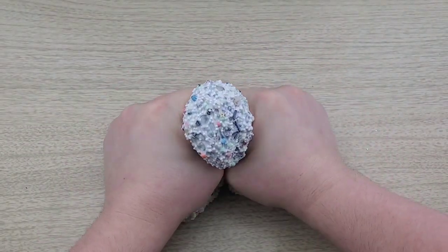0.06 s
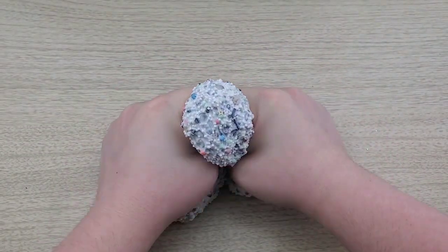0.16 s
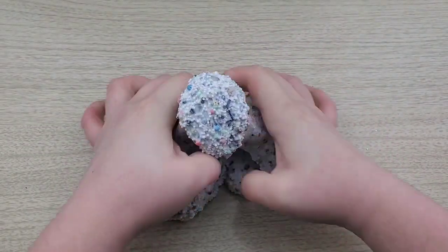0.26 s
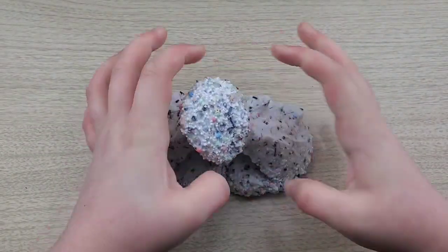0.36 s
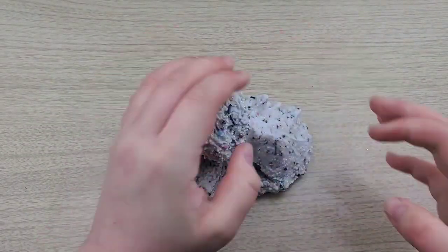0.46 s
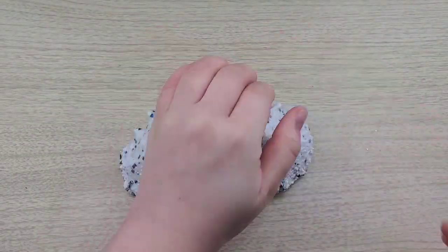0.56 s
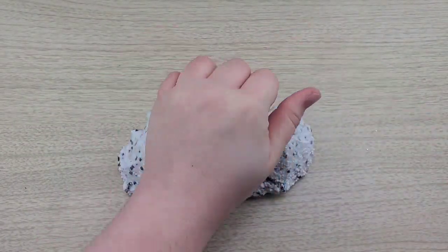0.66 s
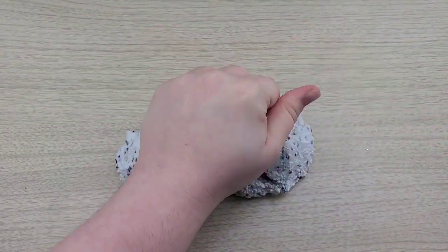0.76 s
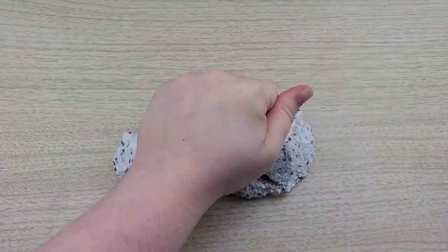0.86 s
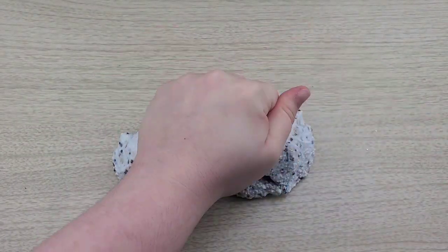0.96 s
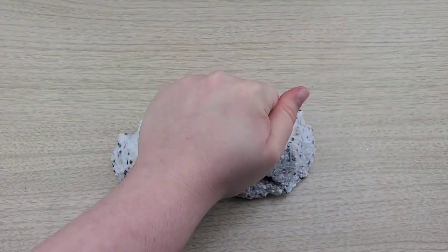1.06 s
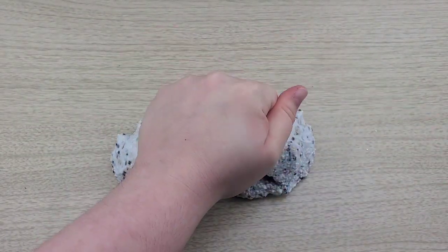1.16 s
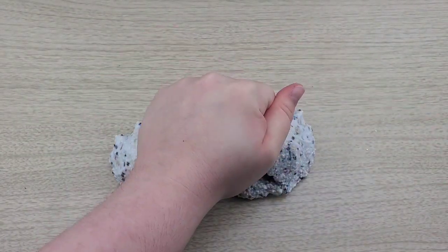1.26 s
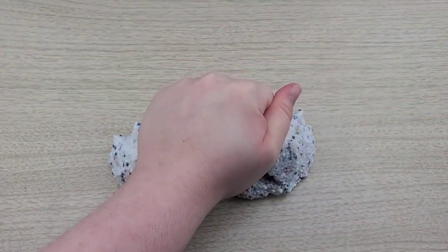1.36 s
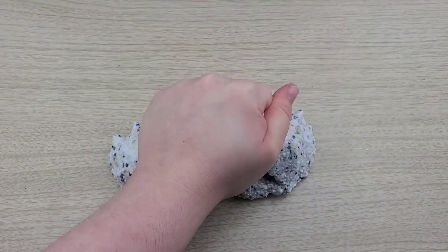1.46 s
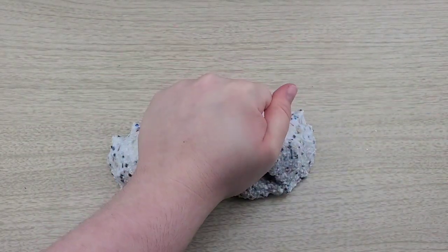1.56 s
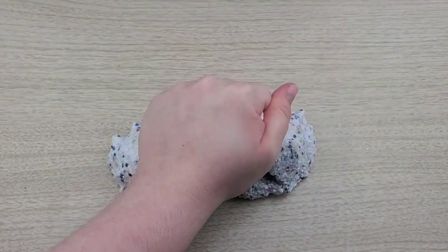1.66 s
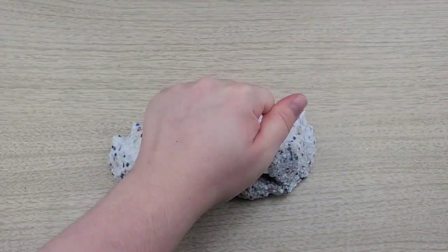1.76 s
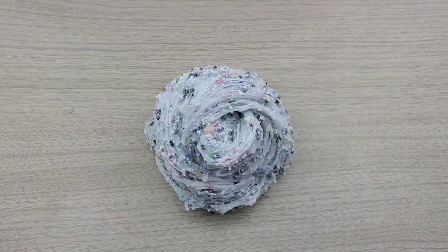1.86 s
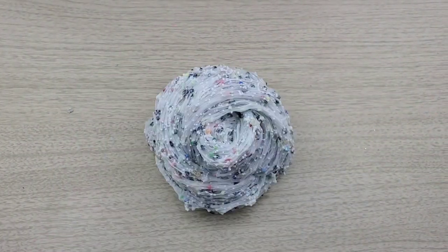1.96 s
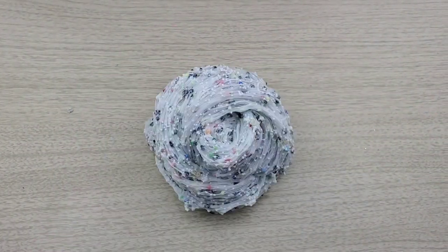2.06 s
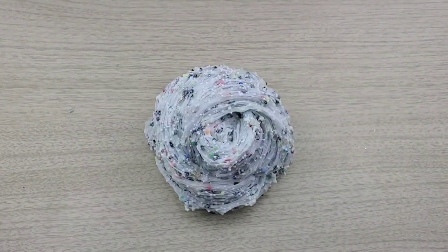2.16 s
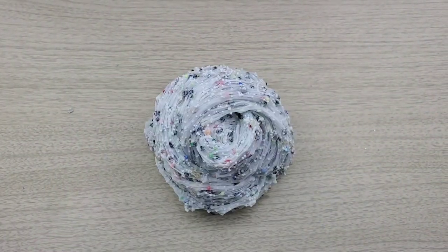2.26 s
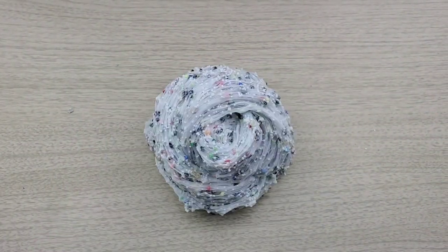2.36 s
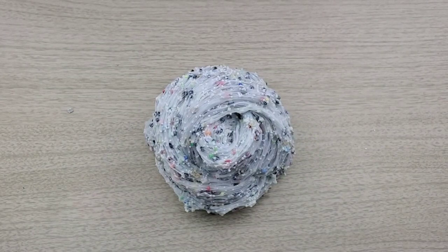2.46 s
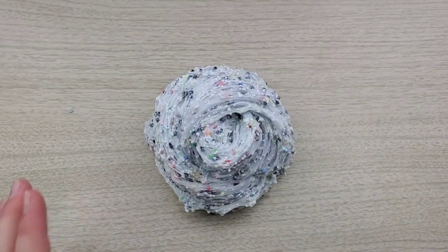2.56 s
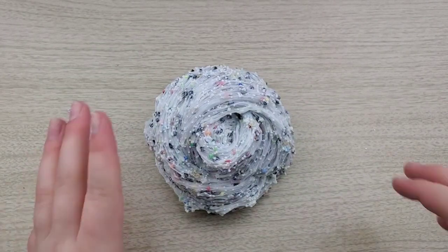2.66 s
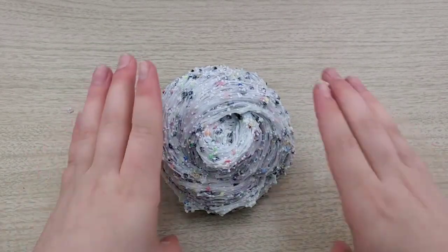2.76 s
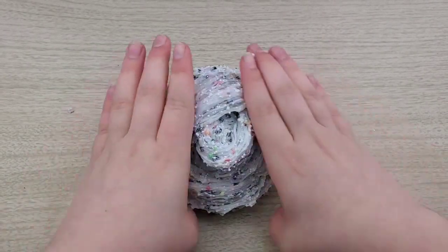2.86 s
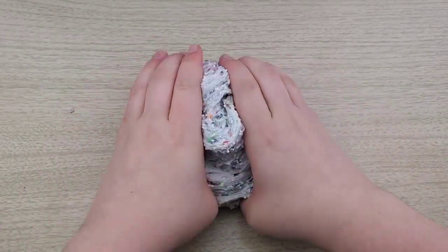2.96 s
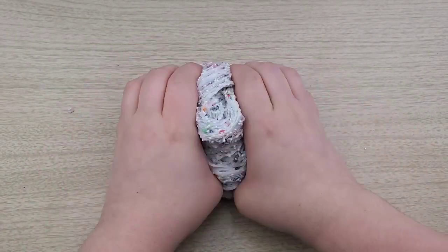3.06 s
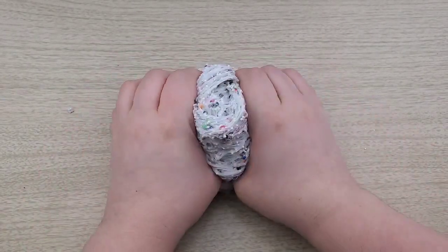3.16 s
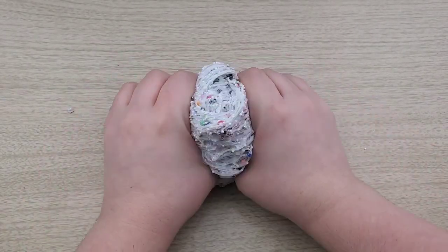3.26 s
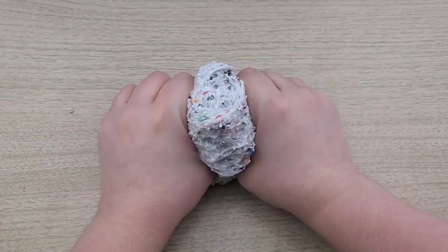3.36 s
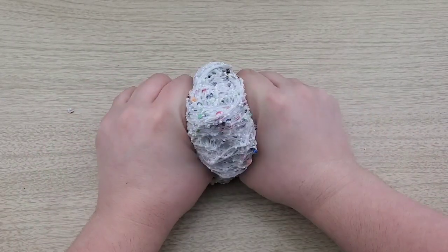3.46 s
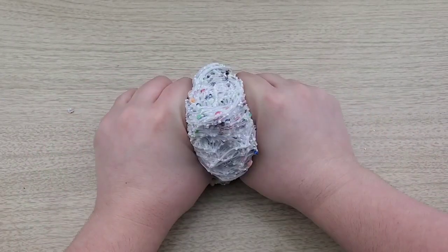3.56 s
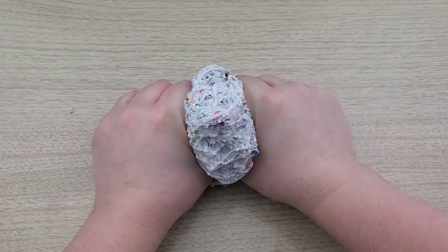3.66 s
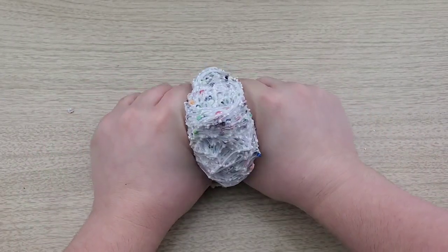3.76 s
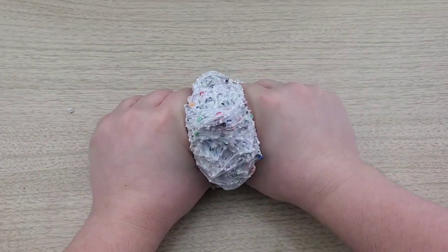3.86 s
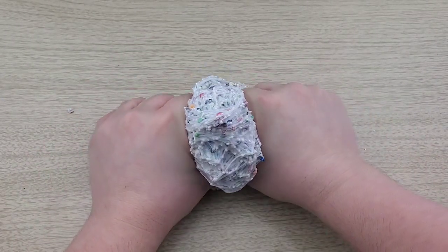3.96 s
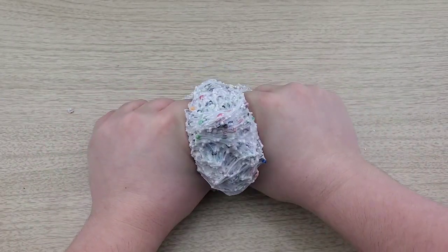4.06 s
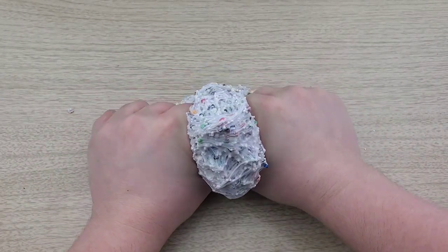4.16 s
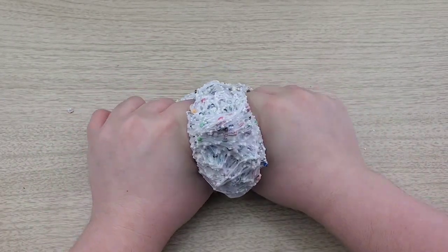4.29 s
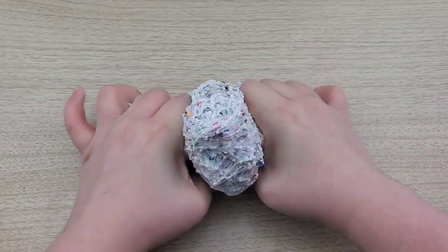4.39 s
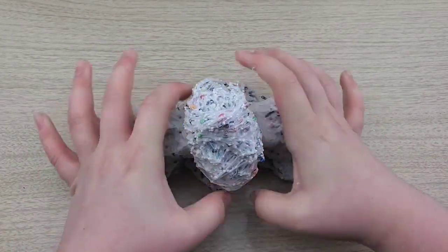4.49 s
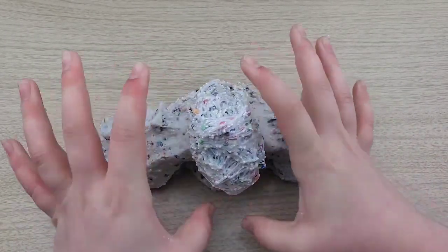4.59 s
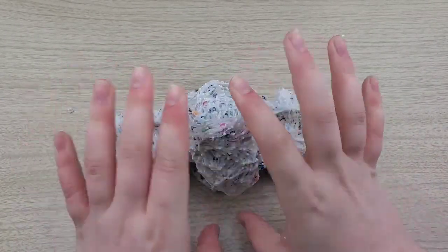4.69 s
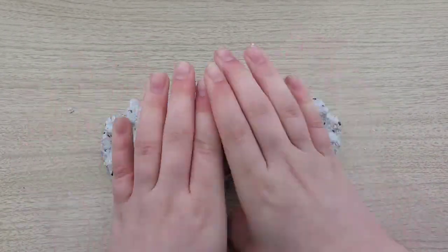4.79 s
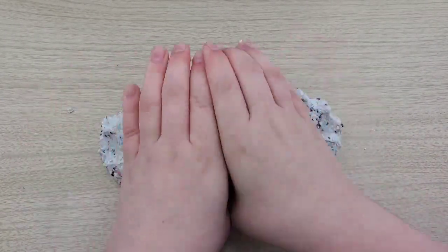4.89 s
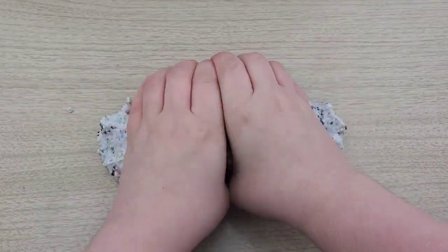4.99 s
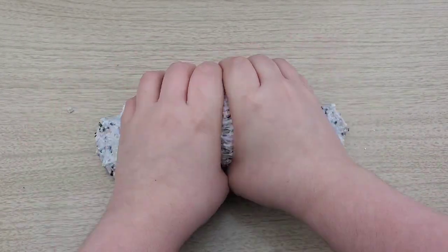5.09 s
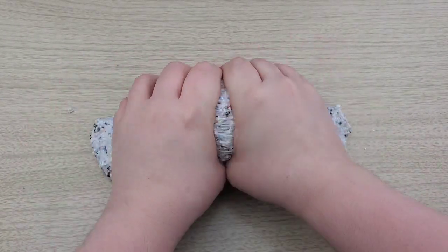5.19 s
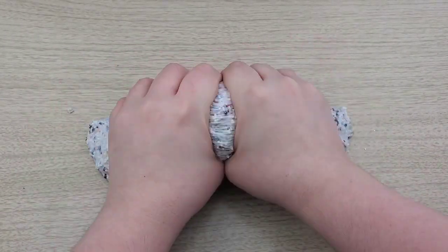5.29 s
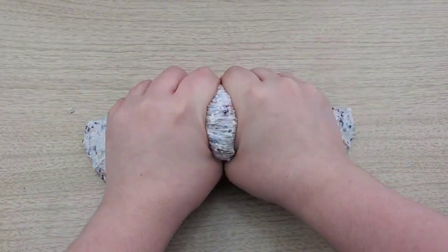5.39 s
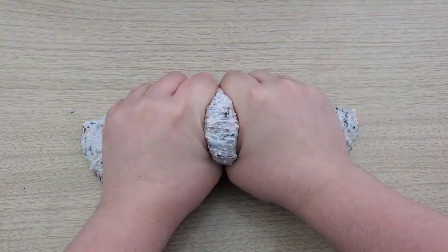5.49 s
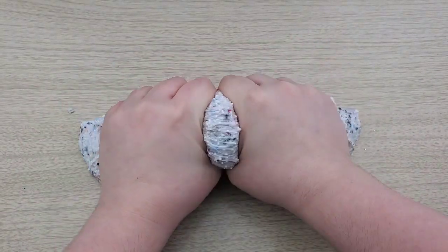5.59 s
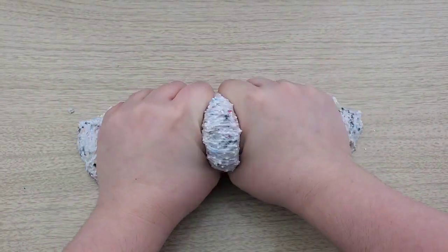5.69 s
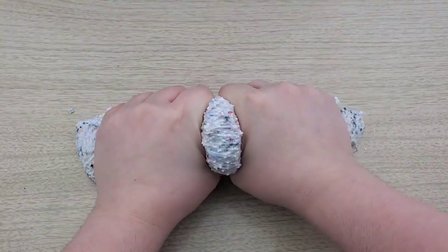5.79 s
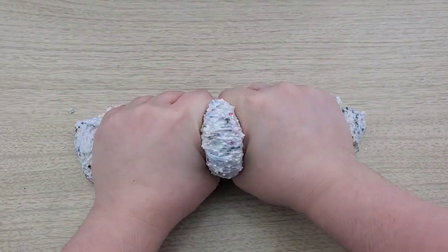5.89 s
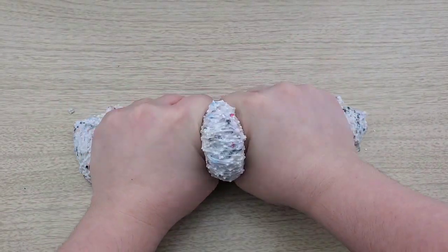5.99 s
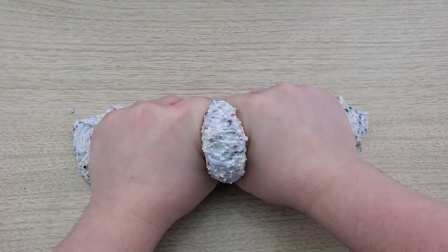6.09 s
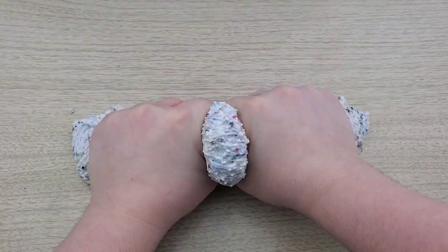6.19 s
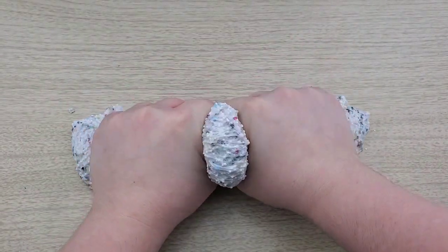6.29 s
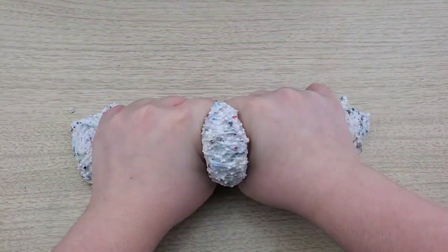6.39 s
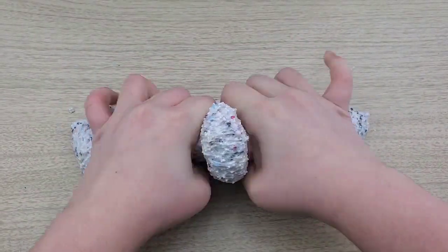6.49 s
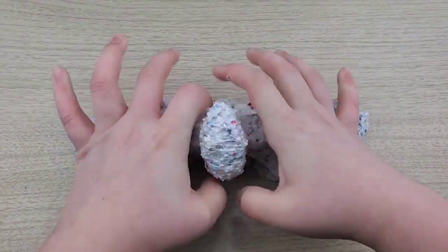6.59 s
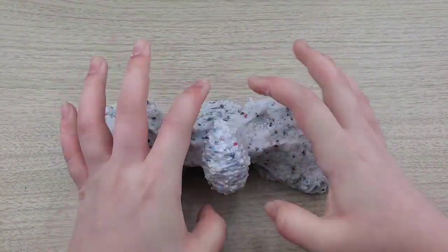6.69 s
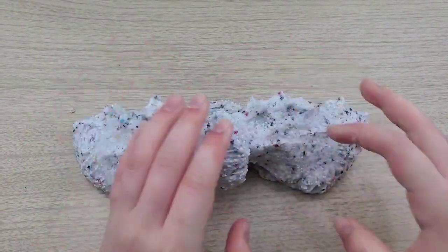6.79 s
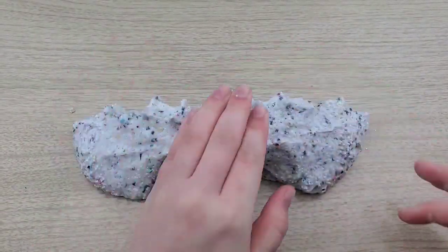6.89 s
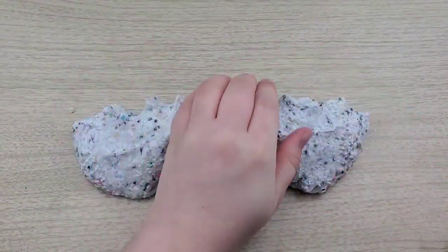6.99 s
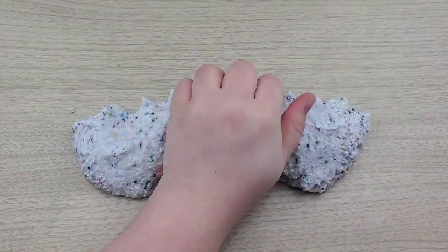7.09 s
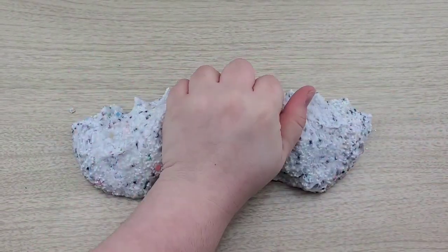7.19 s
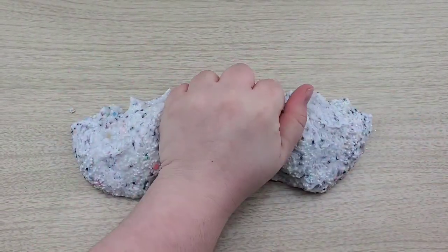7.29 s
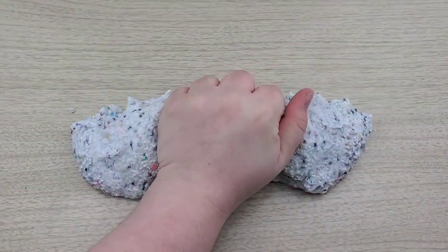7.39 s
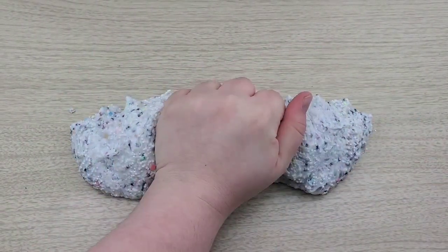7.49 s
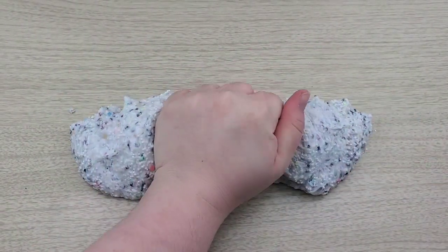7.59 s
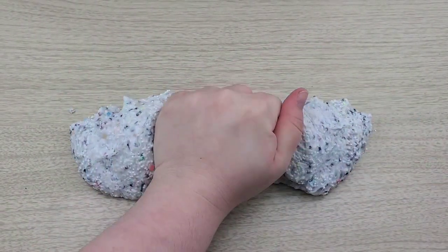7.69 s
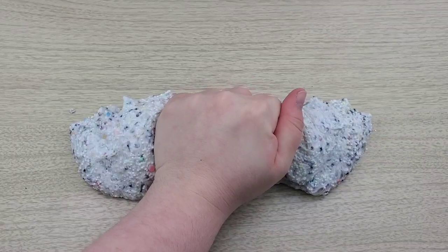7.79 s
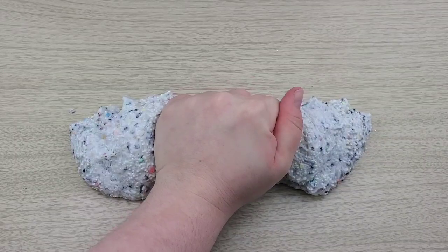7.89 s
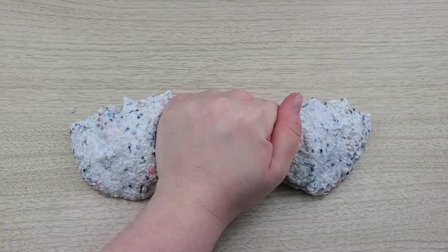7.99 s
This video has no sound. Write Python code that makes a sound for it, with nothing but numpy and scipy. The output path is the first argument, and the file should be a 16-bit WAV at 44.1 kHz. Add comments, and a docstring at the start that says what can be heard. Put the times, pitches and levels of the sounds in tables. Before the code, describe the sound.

Hands squeeze a lump of bead-filled slime on a table, crunchy pops over dense crackle, with soft sticky peeling tears between squeezes.

```python
"""Crunchy pops over a dense crackle: hands knead a lump of bead slime on a table in a small quiet room.
Each squeeze bursts trapped air: single pops snap and ring a damped cavity, tiny bubbles are random clicks.
Between squeezes the fingers peel off with a soft tearing hiss, made of much denser clicks.
Palms land with faint decaying tones; low filtered noise is the room rumble, with a faint even hiss on top."""
import sys
import numpy as np
from scipy import signal
from scipy.fft import rfft, irfft, next_fast_len
from scipy.io import wavfile

SR = 44100
rng = np.random.default_rng(int(sys.argv[2]) if len(sys.argv) > 2 else 0)


def output_pcm(signal):
    """Save a mono or channel-first signal as 16-bit PCM at the path in sys.argv[1].

    Samples are clipped to [-1, 1] before scaling.
    """
    pcm = np.clip(np.atleast_2d(signal).T, -1, 1) * 32767
    wavfile.write(sys.argv[1], SR, np.round(pcm).astype(np.int16))


N = 355005
TIME = np.arange(N) / SR

SWELL_POWER = 1.93   # gain grows with this power of the time since the movement began
# the lump runs out of air, large bubbles first; the crackle dies as the grip opens
LARGE_DRAIN_DB_PER_S, FINE_DRAIN_DB_PER_S, RELAX_DB_PER_S = 23, 11, 134.5
# fewer and fewer threads hold on, then the last part at once
TEAR_FADE_DB_PER_S, HISS_FADE_DB_PER_S, BREAK_DB_PER_S = 102.5, 39, 900
HISS_LAG_S = 0.0072   # the finest threads stretch longer before they part
CLUMP_DB, CLUMPS_PER_S = 2, 38
# lesser pops: typical pitch and scatter; level against the crackle and scatter
LESSER_HZ, LESSER_OCTAVES = 3400, 0.45
LESSER_RING_DB, LESSER_SNAP_DB, LESSER_SPREAD_DB = 1.5, 7.5, 3
CUTOFF_HZ = 16100


def pops(pockets, ring_db, snap_db, q, snap_hz, scatter_db_per_octave):
    """The film snaps with a bright tick while the opened pocket rings for a few cycles."""
    # what table and hands do to a pop: (frequency [Hz], gain [dB])
    pop_colour = [(100, 2.5), (230, 9.5), (450, 5), (580, -1), (780, -1), (950, 4.5), (2500, 0),
                  (2900, -4.5), (3800, 0), (6000, -3), (8500, -3.5), (12500, -0.5), (16000, -0.5)]
    out = np.zeros((2, N + SR))
    bright = signal.butter(2, snap_hz, "high", fs=SR)
    for start_s, hz, cavity_db, film_db in pockets:
        # low pockets give one clean knock; high ones scatter into a short spit
        scatter_db = scatter_db_per_octave * np.log2(hz / 2500)
        knock = burst(scatter_db + 3.0, t60_s=0.042, pan_db=2.0)
        jolt = cavity(knock, 1100, 1.0)   # the mass around the pocket gives way
        ring = cavity(knock, hz, q) + 0.08 * knock
        ring = cavity(ring, hz, q) + 0.2 * jolt
        tick = burst(scatter_db + 4.5, t60_s=0.033, pan_db=2.5)
        snap = signal.lfilter(*bright, tick)
        pop = from_db(cavity_db + ring_db) * rms_one(ring)
        pop = pop + from_db(film_db + snap_db) * rms_one(snap)
        at = round(start_s * SR)
        out[:, at:at + pop.shape[1]] += pop
    return coloured(out[:, :N], pop_colour)


def lesser_pops(large_db, small_db, count):
    """More pockets, one at random in each equal slot, follow the squeeze level; rows as for pops()."""
    at = ((np.arange(count) + rng.random(count)) * N / count).astype(int)
    pitch, ring, snap = rng.standard_normal((count, 3)).T
    hz = LESSER_HZ * 2 ** (LESSER_OCTAVES * pitch)
    ring_db = large_db[at] + LESSER_RING_DB + LESSER_SPREAD_DB * ring
    snap_db = small_db[at] + LESSER_SNAP_DB + LESSER_SPREAD_DB * snap
    return list(zip(at / SR, hz, ring_db, snap_db))


def bubbling():
    """Hand force over time: level in dB of the larger and of the finest bubbles through all squeezes."""
    # the hands close on the lump: (start [s], tightening [s], full grip [s], whole length [s],
    # larger bubbles, relative level [dB], finest bubbles, relative level [dB])
    squeezes = [(-0.1, .1, .1, 0.43, -57, -52), (0.75, 0.16, 0.24, 0.96, -50, -46),
                (3.081, 0.16, 0.33, 1.28, -28.5, -29.5), (4.951, 0.34, 0.37, 1.6, -32.5, -32.5),
                (7.117, 0.28, .04, .92, -36, -34)]
    large, fine = np.full((2, N), 1e-5)   # floor keeps the logarithm finite
    for start_s, rise_s, hold_s, length_s, large_db, fine_db in squeezes:
        movement = start_s, rise_s, hold_s, length_s
        large += from_db(large_db) * gesture(*movement, LARGE_DRAIN_DB_PER_S, RELAX_DB_PER_S)
        fine += from_db(fine_db) * gesture(*movement, FINE_DRAIN_DB_PER_S, RELAX_DB_PER_S)
    return 20 * np.log10(large), 20 * np.log10(fine)


def squeeze(large_db, small_db, big_db, medium_db, fine_db):
    """A harder squeeze bursts more bubbles a second and opens bigger, lower ones."""
    # crackle colours: (frequency [Hz], relative level [dB])
    coarse_colour = [(120, -25), (220, -6.5), (450, -8.5), (580, -11.5), (780, -7), (950, -3.5), (2500, -4),
                     (4000, -6.5), (6000, -17), (10000, -11)]
    fine_colour = [(1500, -30.5), (3500, -7), (6000, -2), (8500, -4.5), (12500, 0), (16000, -1.5)]
    force = from_db(0.23 * (large_db + 30.5))
    fine_force = from_db(0.75 * (small_db + 33.0))
    big = crackle(200 * force, 8.0, coarse_colour, low_hz=1280, high_hz=2420, q=0.6, scatter_db=0.5)
    medium = crackle(380 * force, 4.4, coarse_colour, low_hz=2610, high_hz=5000, q=1.4, scatter_db=3.5)
    small = crackle(700 * fine_force, 7.8, fine_colour, low_hz=5000, high_hz=15000, q=2.8, scatter_db=15.5)
    coarse = force * from_db(big_db) * big + from_db(medium_db) * medium
    bubbles = from_db(large_db) * coarse + from_db(small_db + fine_db) * small
    return from_db(clumping()) * bubbles


def clumping(count=1000):
    """Quick random level swings in dB, standing for bubbles that set off their neighbours."""
    return CLUMP_DB * np.interp(TIME * CLUMPS_PER_S, np.arange(count), rng.standard_normal(count))


def crackle(per_s, spread_db, spectrum, low_hz, high_hz, q, scatter_db, count=10):
    """Tiny bubbles of uneven size burst at random, each at one of several pitches; rms 1."""
    sizes = from_db(spread_db * np.minimum(rng.exponential(1, N), 3.0)) * rng.choice([-1, 1], N)
    clicks = sizes * (rng.random(N) < per_s / SR) / np.sqrt(per_s)   # power independent of rate
    pitch_index, out = rng.integers(0, count, N), 0
    for k, hz in enumerate(np.geomspace(low_hz, high_hz, count)):
        tick = burst(scatter_db, t60_s=0.034, pan_db=1.5)
        grain = rms_one(cavity(tick, hz, q) + 0.71 * tick)
        chosen = (clicks * (pitch_index == k))[None]
        out = out + signal.oaconvolve(chosen, grain, axes=1)[:, :N]
    return rms_one(coloured(out, spectrum))


def peel(tear_db, hiss_db, palm_db, palm_lag_s):
    """Thousands of sticky threads let go of the skin, sounding in the hollow of the hand."""
    # fingers peeling off: (start [s], pulling up [s], full pull [s], whole length [s],
    # hollow tearing, relative level [dB], sticky hiss, relative level [dB])
    peels = [(0.338, 0.084, 0.028, 0.23, -32, -37.5), (1.902, 0.12, 0.11, 0.23, -38, -40.5),
             (4.513, 0.072, 0.039, 0.27, -30.5, -39), (4.792, 0.057, .03, 0.085, -53.5, -45),
             (6.588, 0.074, 0.067, .35, -33.5, -43)]
    # colours of tearing, hiss and palm: (frequency [Hz], relative level [dB])
    tearing_colour = [(200, -5), (330, -2), (460, -5.5), (590, -3), (790, -3), (930, 5), (1400, -3.5),
                      (2300, -0.5), (4000, -9), (8000, -54)]
    sticky_colour = [(1200, -13), (3500, 3.5), (5500, -2), (8000, -0.5), (12000, 1.5), (16000, 3)]
    palm_colour = [(100, -21), (200, 3), (300, 5), (450, 0), (800, -15.5)]
    hollow, sticky = np.zeros((2, N))
    for start_s, rise_s, hold_s, length_s, hollow_db, sticky_db in peels:
        tear = gesture(start_s, rise_s, hold_s, length_s, TEAR_FADE_DB_PER_S, BREAK_DB_PER_S)
        stick = gesture(start_s, rise_s + HISS_LAG_S, hold_s, length_s, HISS_FADE_DB_PER_S, BREAK_DB_PER_S)
        hollow += from_db(hollow_db + tear_db) * tear
        sticky += from_db(sticky_db + hiss_db) * stick
    tearing = crackle(1800, 2.6, tearing_colour, low_hz=505, high_hz=5350, q=0.6, scatter_db=1.5)
    hiss = crackle(5400, 12.0, sticky_colour, low_hz=4500, high_hz=15000, q=0.6, scatter_db=26.0)
    # the broad palm pulls free just after the fingers, as low noise
    palm = from_db(palm_db) * np.interp(TIME - palm_lag_s, TIME, hollow)
    palm_noise = rms_one(coloured(diffuse(N), palm_colour))
    return hollow * tearing + sticky * hiss + palm * palm_noise


def gesture(start_s, rise_s, hold_s, length_s, fade_db_per_s, stop_db_per_s):
    """Gain of one hand movement: it swells, holds, fades slowly and stops."""
    age = TIME - start_s
    swell = np.clip(age / rise_s, 0, 1) ** SWELL_POWER
    fade_db = fade_db_per_s * np.maximum(age - rise_s - hold_s, 0)
    stop_db = stop_db_per_s * np.maximum(age - length_s, 0)
    return swell * from_db(-fade_db - stop_db)


def touches(thud_hz, t60_s):
    """Soft flesh meets the soft mass with a dull thud, a decaying sine."""
    # palms landing on the lump: (time [s], level [dB])
    landings = [(3.072, -48), (5.045, -67)]
    out = np.zeros(N)
    for start_s, level_db in landings:
        age = np.maximum(TIME - start_s, 0)
        out += from_db(level_db - 60 * age / t60_s) * np.sin(2 * np.pi * thud_hz * age)
    return out


def room(x, wet_db, t60_s, treble_t60_s, size=24000):
    """A short diffuse tail whose treble dies sooner."""
    t, noise = np.arange(size) / SR, diffuse(size)
    low = signal.lfilter(*signal.butter(1, 6000, fs=SR), noise)
    tail = low * from_db(-60 * t / t60_s) + (noise - low) * from_db(-60 * t / treble_t60_s)
    tail = rms_one(tail * np.clip(t / 0.0057, 0, 1)) / np.sqrt(size)   # 5.7 ms onset
    send = x.mean(0)[None] * np.sqrt(2)
    return x + from_db(wet_db) * signal.fftconvolve(send, tail, axes=1)[:, :N]


def background(air_db):
    """Low rumble of the room and a faint even hiss, both filtered diffuse noise."""
    # room rumble: (time [s], level [dB])
    rumble_level = [(0, -54.5), (.6, -52), (1.5, -49), (2.3, -55.5), (2.6, -60.5), (3.5, -56), (5.3, -59),
                    (8.05, -62.5)]
    # colours of rumble and hiss: (frequency [Hz], relative level [dB])
    rumble_colour = [(20, -24), (35, -14), (55, -2.5), (85, -1.5), (130, -10), (300, -13.5), (500, -21.5),
                     (800, -26), (1300, -39), (3000, -48.5)]
    air_colour = [(300, 4.5), (1500, -1.5), (3500, 4), (5000, -10.5), (8000, -3), (16000, -18)]
    rumble_db = np.interp(TIME, *np.transpose(rumble_level))
    rumble = from_db(rumble_db) * rms_one(coloured(diffuse(N), rumble_colour))
    return rumble + from_db(air_db) * rms_one(coloured(diffuse(N), air_colour))


def burst(scatter_db, t60_s, pan_db, size=1024):
    """One click, reaching the left side first, and its quick scatter off hands and table; unit energy."""
    scatter = diffuse(size) * from_db(-60 * np.arange(size) / SR / t60_s)
    out = from_db(scatter_db) * rms_one(scatter) / np.sqrt(size)
    out[[0, 1], [0, rng.integers(1, 4)]] += 1   # right side 1 to 3 samples late
    out *= from_db(rng.normal(0, pan_db) * np.array([[0.5], [-0.5]]))
    return rms_one(out) / np.sqrt(size)


def cavity(x, hz, q):
    """A heavily damped air pocket: a resonance, held to a quarter of the sample rate at most."""
    return signal.lfilter(*signal.iirpeak(min(hz, SR / 4), q, fs=SR), x)


def diffuse(count):
    """Stereo noise, alike in the bass and unrelated in the treble."""
    # left-right likeness of diffuse sound: (frequency [Hz], correlation [-1 to 1])
    likeness = [(100, 0.97), (300, 0.93), (600, 0.8), (1200, 0), (2500, 0), (16000, 0)]
    size = next_fast_len(count)
    mid, side = rfft(rng.standard_normal((2, size)))
    alike = at_hz(likeness, np.arange(len(mid)) * SR / size)
    pair = np.sqrt(1 + alike) * mid + np.sqrt(1 - alike) * side * [[1], [-1]]
    return irfft(pair, size)[:, :count]


def coloured(x, spectrum):
    """Causal (minimum-phase) filter with the given spectrum, by folding the cepstrum."""
    size = 4096
    gain = from_db(at_hz(spectrum, np.arange(size // 2 + 1) * SR / size))
    cepstrum = irfft(np.log(gain))
    cepstrum[1:size // 2] *= 2
    cepstrum[size // 2 + 1:] = 0
    response = irfft(np.exp(rfft(cepstrum)))
    return signal.fftconvolve(x, response[None], axes=1)[:, :x.shape[1]]


def at_hz(points, hz):
    """Read a spectrum on a log-frequency axis."""
    f, value = np.transpose(points)
    return np.interp(np.log(hz + 1), np.log(f), value)


def from_db(db):
    """Decibels to gain."""
    return 10 ** (np.asarray(db) / 20)


def rms_one(x):
    """Scale to unit rms."""
    return x / np.sqrt(np.mean(x ** 2) + 1e-20)


def scene():
    """Slime on the table, heard in the room."""
    # single air pockets bursting, from faint stray pops to loud ones: (time [s], cavity pitch [Hz],
    # cavity ring, relative level [dB], film snap, relative level [dB])
    single_pops = [(0.0194, 1850, -32, -24), (0.049, 3540, -34, -22), (0.1775, 3650, -36.5, -29.5),
                   (0.201, 3800, -35, -24.5), (0.991, 3850, -30, -24), (1.1135, 3330, -14.5, -12.5),
                   (1.25, 3400, -37, -30), (1.272, 4760, -52, -32), (1.3127, 4270, -38, -25),
                   (1.353, 4220, -34.5, -30), (1.3882, 3860, -27.5, -11), (1.479, 4990, -50, -25),
                   (1.4899, 4050, -36, -21.5), (1.536, 3900, -24.5, -25), (1.549, 3900, -22.5, -25),
                   (1.603, 4510, -42, -28), (1.6614, 4500, -33, -35.5), (1.707, 4460, -42, -37),
                   (1.838, 1840, -34.5, -33.5), (2.3962, 1930, -56.5, -54), (3.0777, 2110, -64, -67.5),
                   (3.123, 3600, -42, -36), (3.384, 2500, -22, -21), (3.4465, 2720, -21, -32),
                   (3.484, 3970, -16, -33), (3.491, 1930, -18.5, -45), (3.5193, 1430, -24.5, -37),
                   (3.5348, 2740, -19.5, -39), (3.5494, 3050, -15.5, -42), (3.6002, 2770, -19.5, -35),
                   (3.6344, 2300, -19.5, -26), (3.6497, 2320, -19, -25), (3.7234, 2200, -17, -13.5),
                   (3.799, 3300, -28, -14.5), (3.893, 2880, -27, -16.5), (3.9538, 4200, -38, -18.5),
                   (3.993, 2260, -20, -44), (4.048, 2180, -29.5, -38), (4.129, 3100, -27, -27),
                   (4.209, 2620, -31, -26), (4.2445, 2110, -25.5, -27), (4.3157, 3700, -31.5, -22),
                   (4.35, 2870, -19.5, -24), (4.3738, 2080, -23, -45), (5.021, 2860, -43, -38),
                   (5.058, 2960, -29.5, -31.5), (5.205, 1230, -29.5, -39), (5.3574, 3030, -29, -23),
                   (5.4222, 3200, -24, -19.5), (5.529, 3380, -20, -18), (5.616, 3740, -26, -10.5),
                   (5.7401, 1640, -30, -16.5), (5.779, 2740, -24, -19.5), (5.7922, 4170, -36, -14.5),
                   (5.825, 3510, -32, -19.5), (5.9384, 4200, -56, -17.5), (5.9704, 4530, -54, -20),
                   (5.996, 6070, -48, -16.5), (6.0832, 1630, -29.5, -25.5), (6.1181, 5500, -26, -19),
                   (6.162, 2440, -32.5, -20), (6.2565, 3200, -31, -22.5), (6.3178, 4220, -27.5, -21.5),
                   (6.3603, 2740, -27.5, -19), (6.42, 2800, -30.5, -23.5), (6.454, 4100, -27.5, -22),
                   (7.124, 3260, -60.5, -49), (7.221, 2650, -38, -58), (7.241, 1340, -44, -41),
                   (7.373, 4100, -33, -27), (7.3924, 2600, -28.5, -45), (7.476, 2120, -17, -48),
                   (7.5203, 4990, -27, -17.5), (7.5433, 4250, -20, -18), (7.6014, 4100, -23.5, -16),
                   (7.6725, 3900, -42, -19.5), (7.7096, 5140, -23.5, -15), (7.742, 5600, -37, -19),
                   (7.817, 4700, -53, -25), (7.8656, 4510, -52, -24), (7.9336, 3900, -29.5, -19)]
    large_db, small_db = bubbling()
    pockets = list(single_pops) + lesser_pops(large_db, small_db, count=150)
    slime = pops(pockets, ring_db=-7.5, snap_db=-6.0, q=1.02, snap_hz=6500, scatter_db_per_octave=8.5)
    slime = slime + squeeze(large_db, small_db, big_db=-8.0, medium_db=-2.5, fine_db=-2.0)
    slime = slime + touches(thud_hz=341, t60_s=0.13)
    slime = slime + peel(tear_db=-2.5, hiss_db=6.0, palm_db=-5.5, palm_lag_s=0.0044)
    return room(slime, wet_db=-11.5, t60_s=0.2, treble_t60_s=0.16) + background(air_db=-81.5)


def record(dry):
    """The two microphones differ a little in colour; the top is cut steeply."""
    # left microphone relative to the right: (frequency [Hz], gain [dB])
    balance = [(250, 0.5), (600, 1), (1200, -0.5), (2500, 1), (5000, -0.7), (8500, -1), (13000, -2)]
    pair = np.vstack([coloured(dry[:1], balance), dry[1:]])
    # order 10, 0.2 dB ripple, 80 dB stopband
    low_pass = signal.ellip(10, 0.2, 80, CUTOFF_HZ, fs=SR, output="sos")
    return signal.sosfilt(low_pass, pair)


dry = scene()
out = record(dry)
output_pcm(out)
```